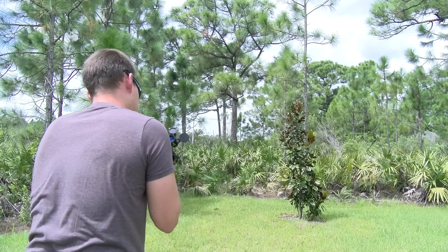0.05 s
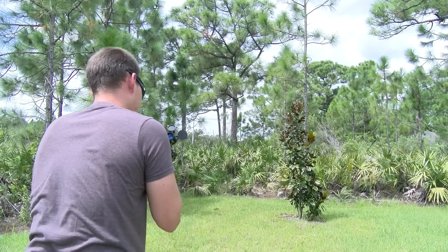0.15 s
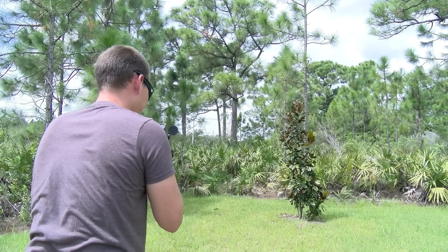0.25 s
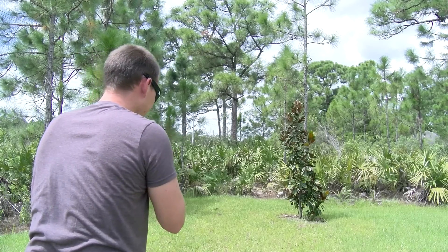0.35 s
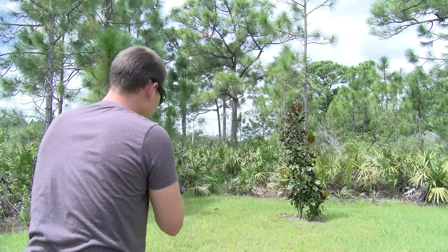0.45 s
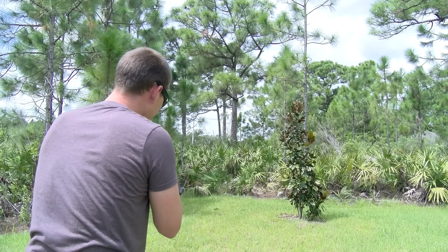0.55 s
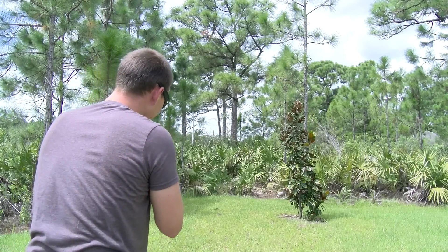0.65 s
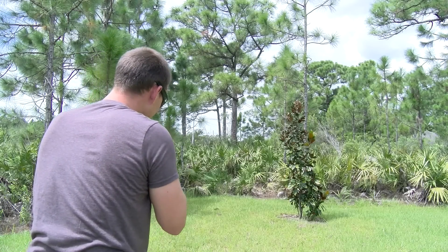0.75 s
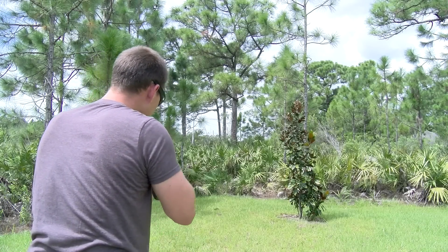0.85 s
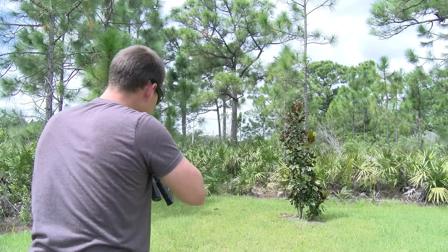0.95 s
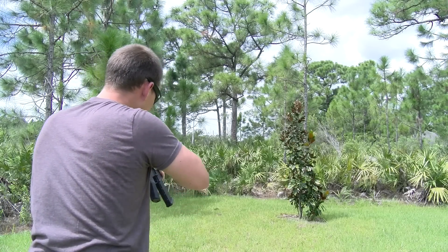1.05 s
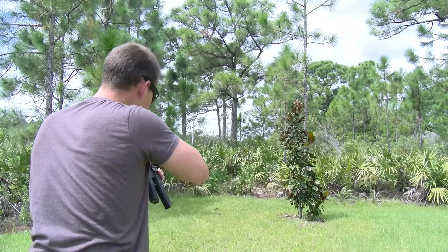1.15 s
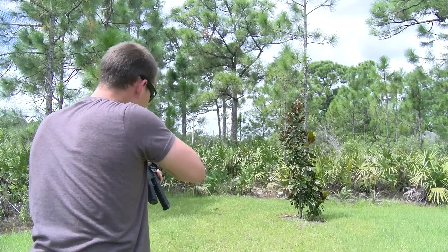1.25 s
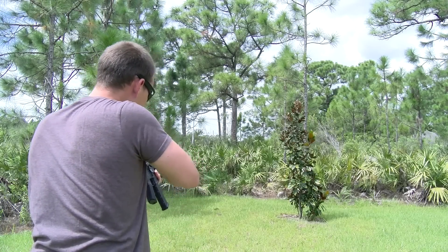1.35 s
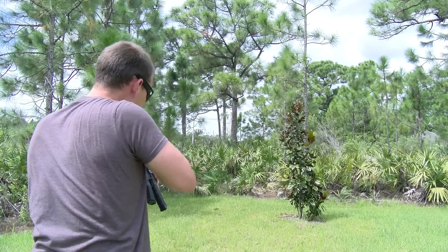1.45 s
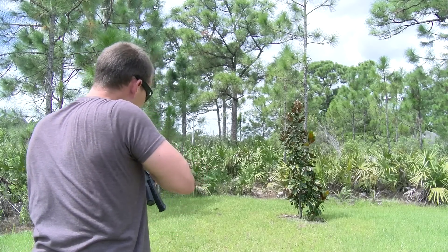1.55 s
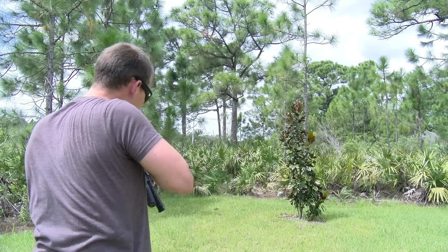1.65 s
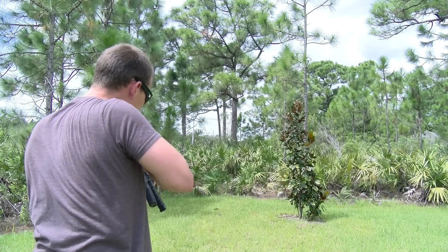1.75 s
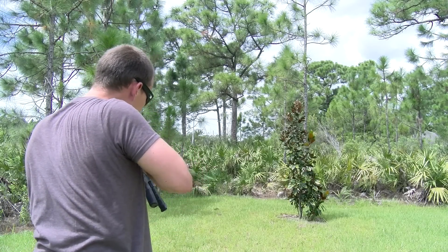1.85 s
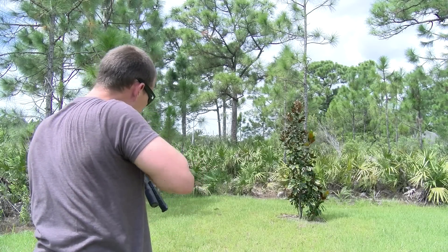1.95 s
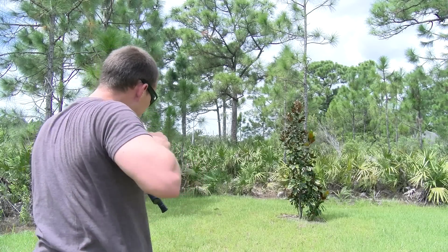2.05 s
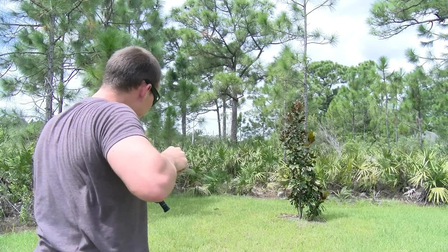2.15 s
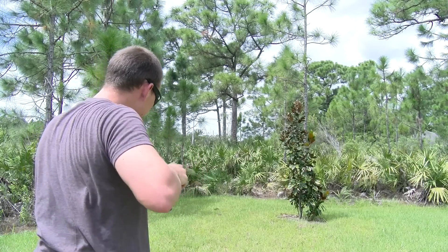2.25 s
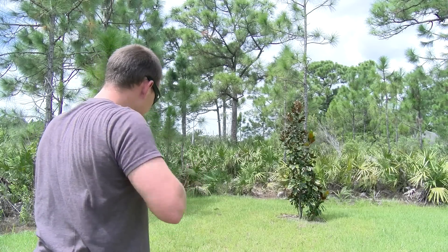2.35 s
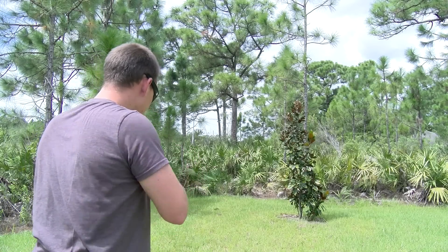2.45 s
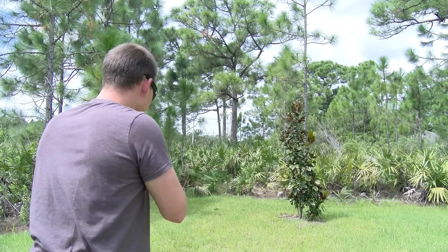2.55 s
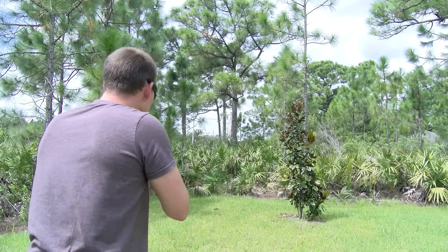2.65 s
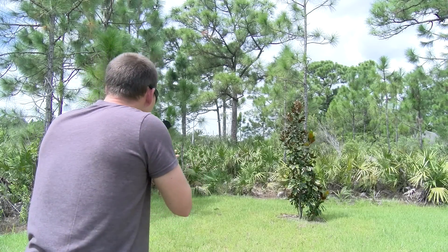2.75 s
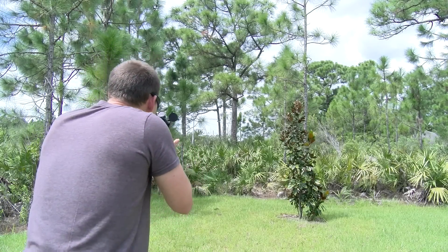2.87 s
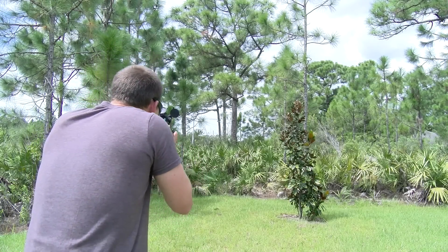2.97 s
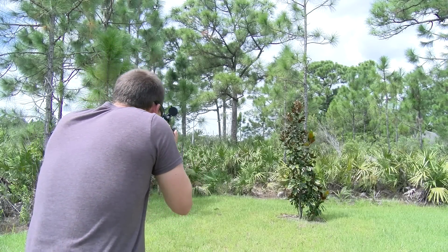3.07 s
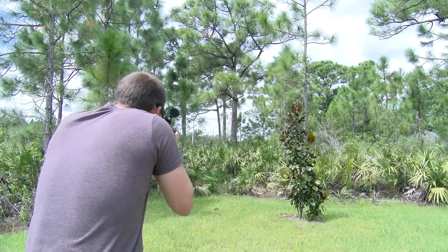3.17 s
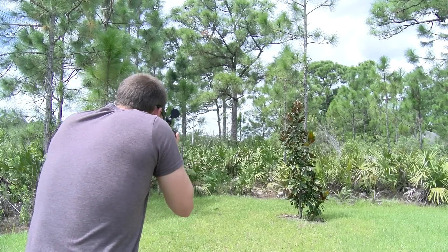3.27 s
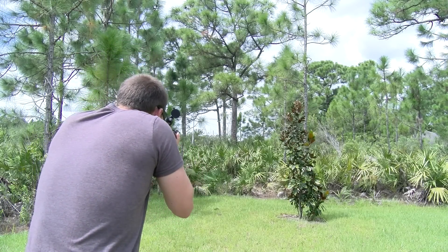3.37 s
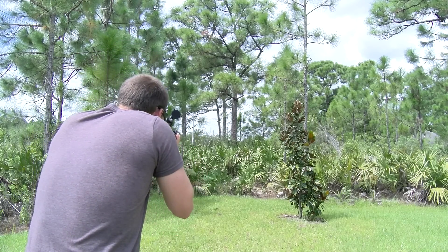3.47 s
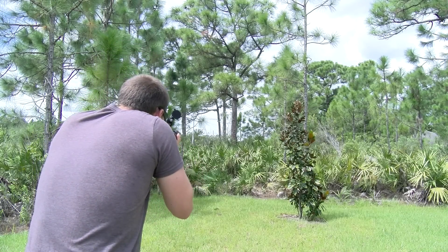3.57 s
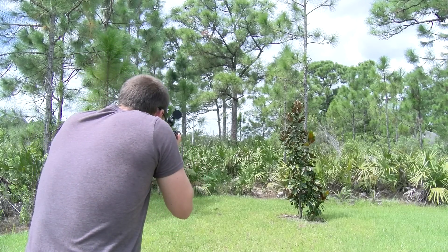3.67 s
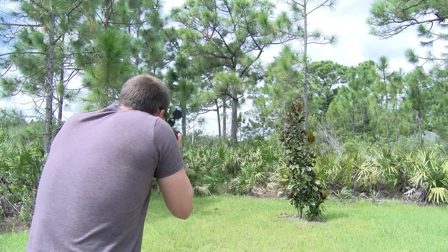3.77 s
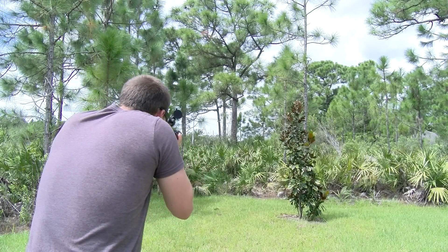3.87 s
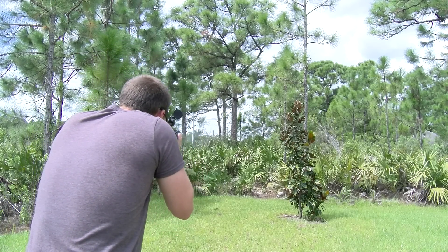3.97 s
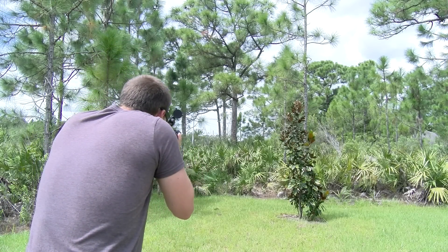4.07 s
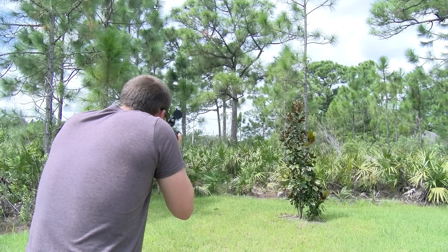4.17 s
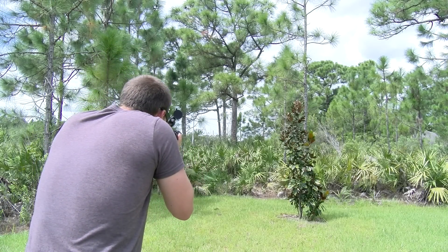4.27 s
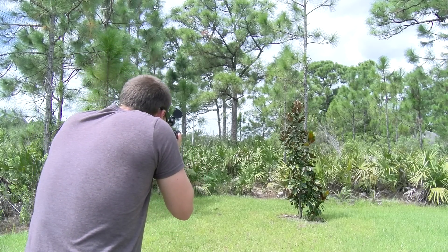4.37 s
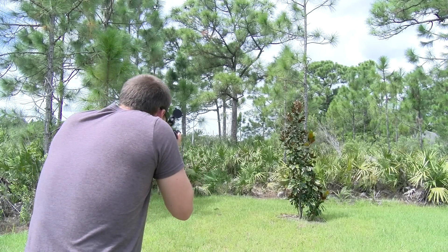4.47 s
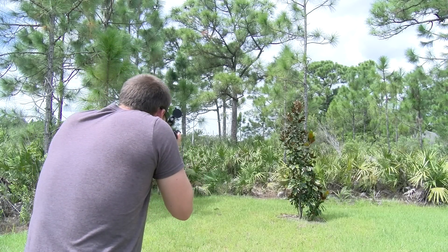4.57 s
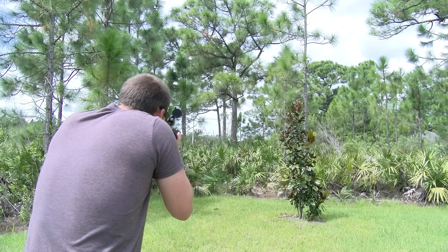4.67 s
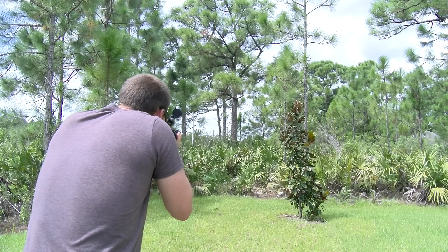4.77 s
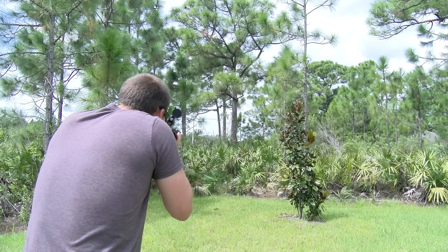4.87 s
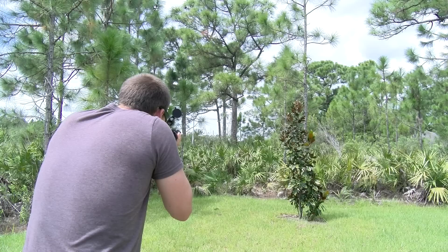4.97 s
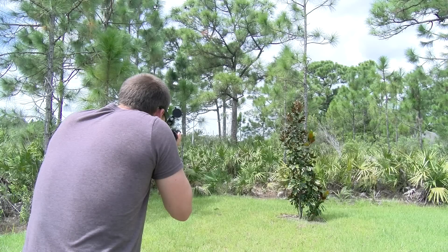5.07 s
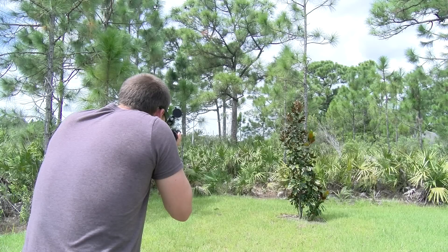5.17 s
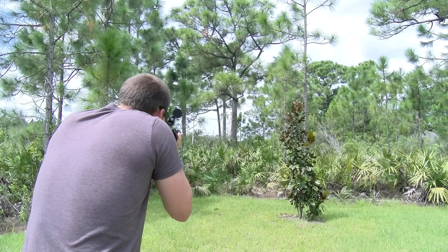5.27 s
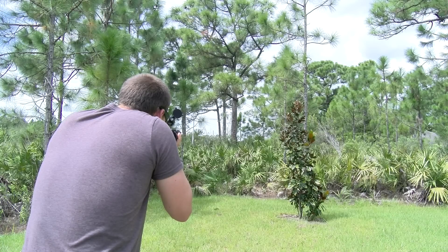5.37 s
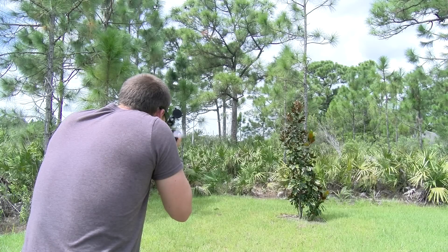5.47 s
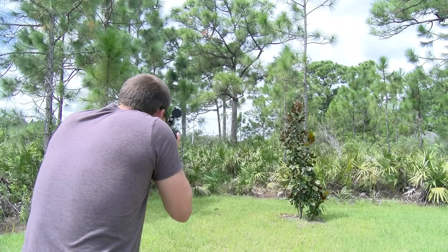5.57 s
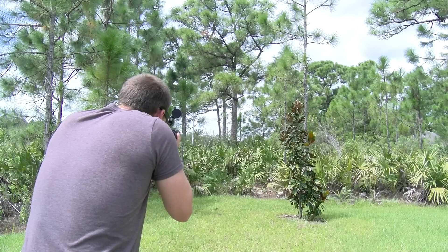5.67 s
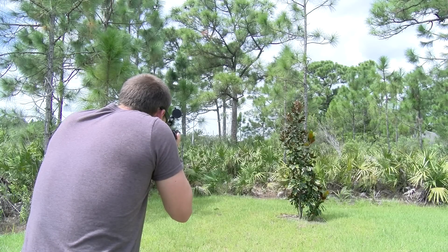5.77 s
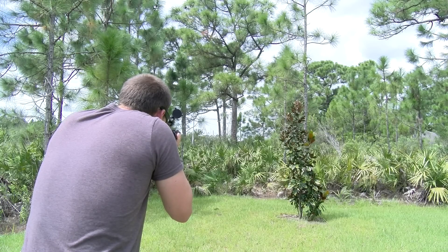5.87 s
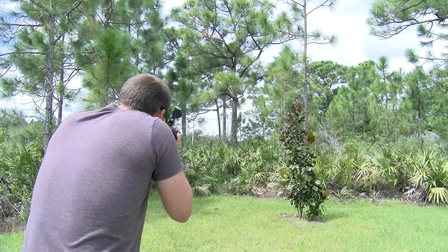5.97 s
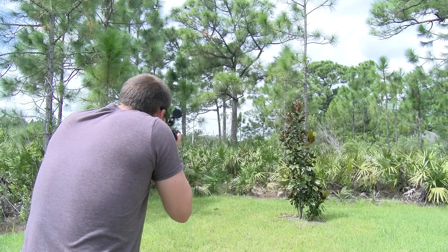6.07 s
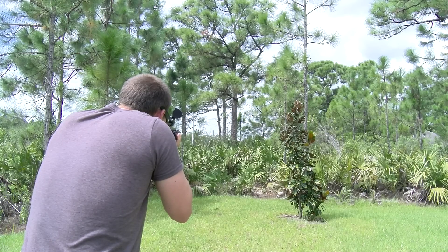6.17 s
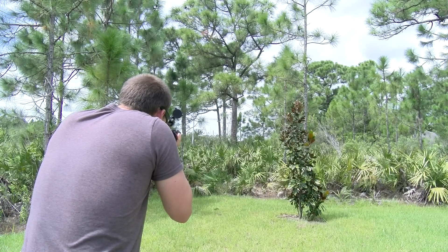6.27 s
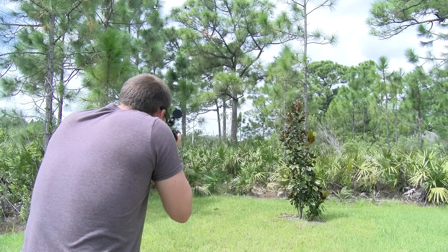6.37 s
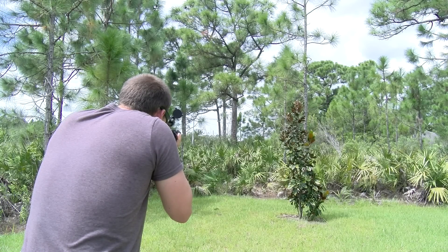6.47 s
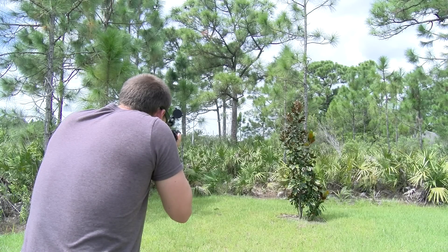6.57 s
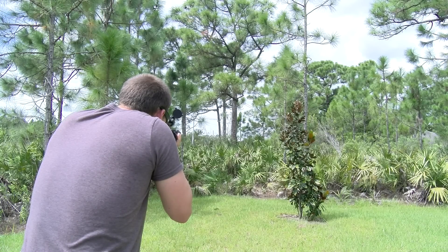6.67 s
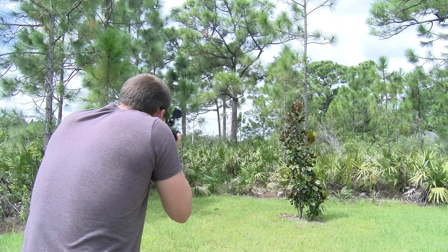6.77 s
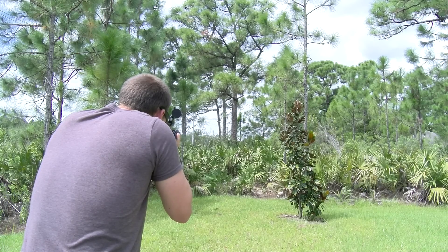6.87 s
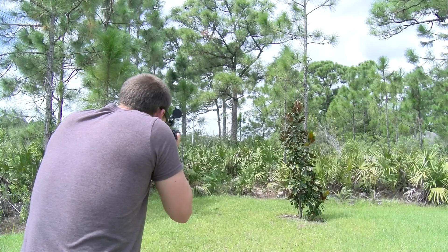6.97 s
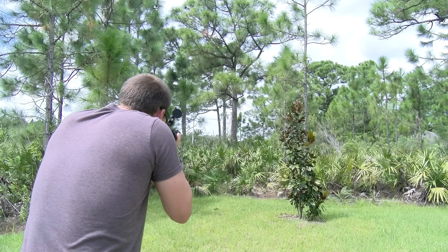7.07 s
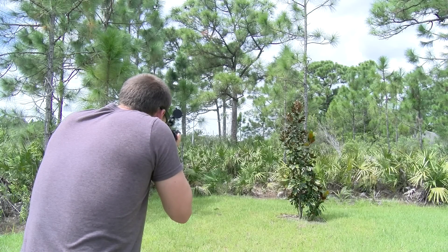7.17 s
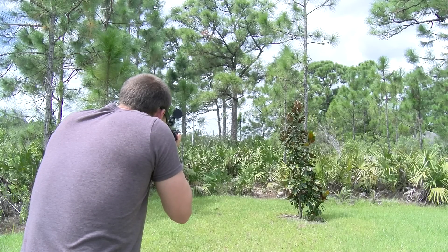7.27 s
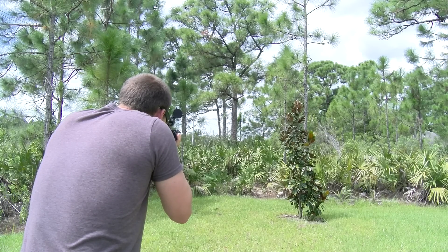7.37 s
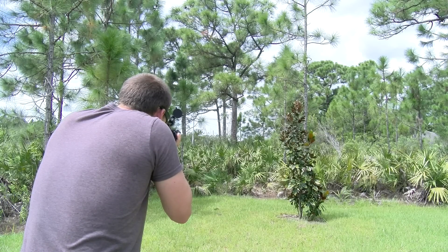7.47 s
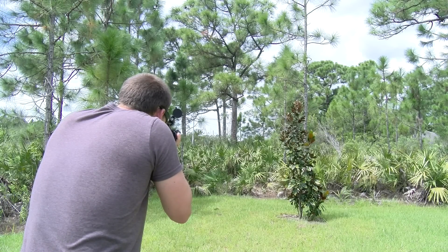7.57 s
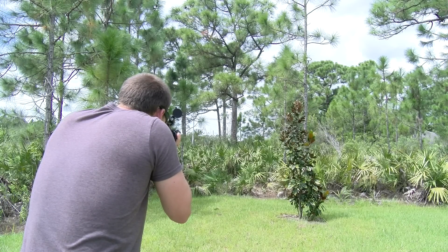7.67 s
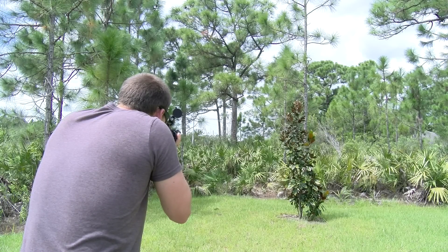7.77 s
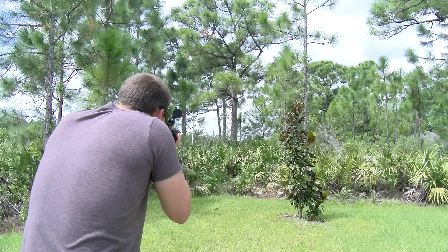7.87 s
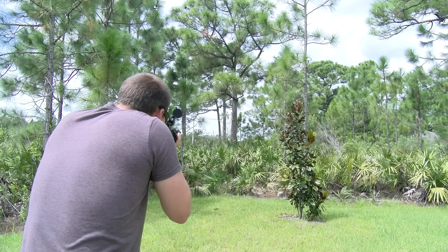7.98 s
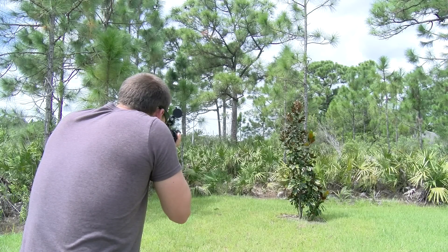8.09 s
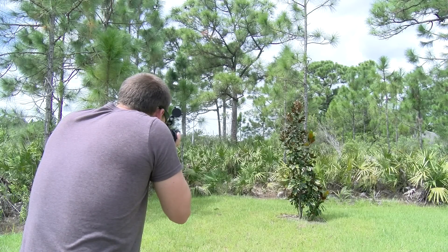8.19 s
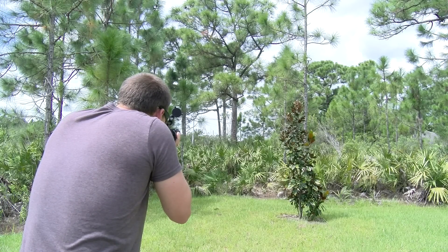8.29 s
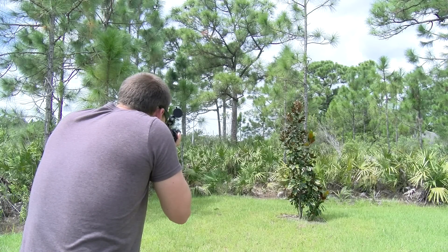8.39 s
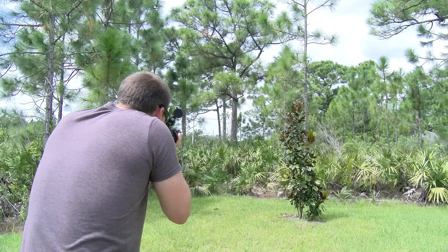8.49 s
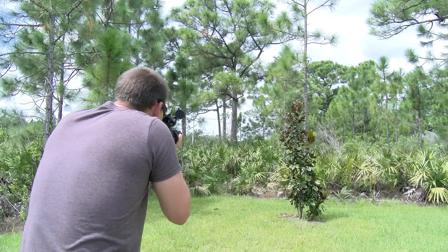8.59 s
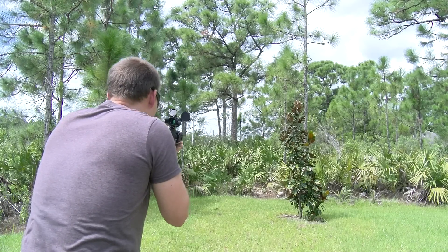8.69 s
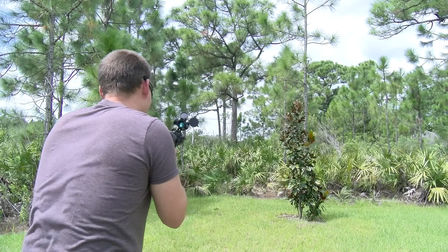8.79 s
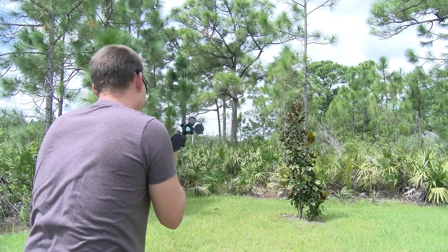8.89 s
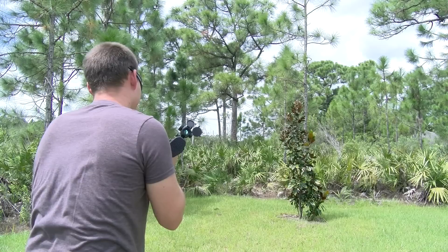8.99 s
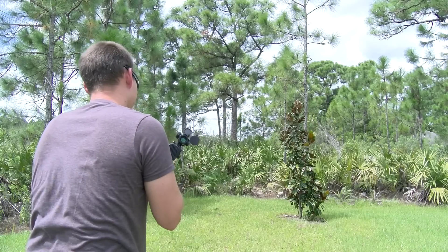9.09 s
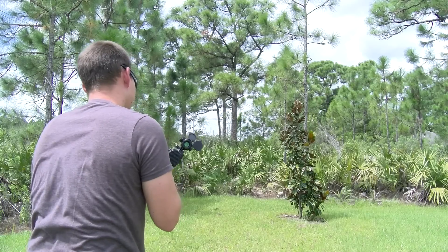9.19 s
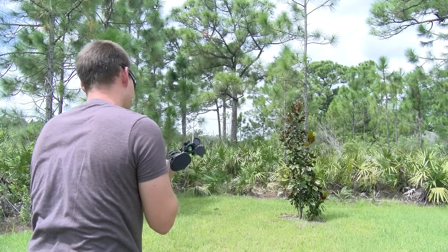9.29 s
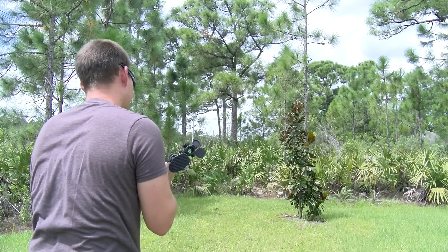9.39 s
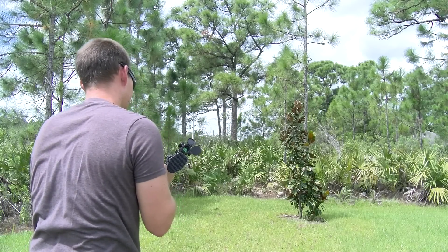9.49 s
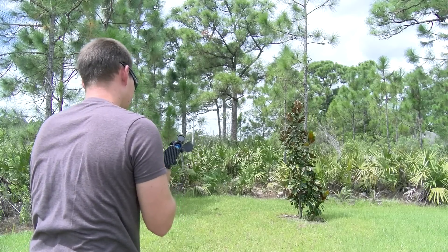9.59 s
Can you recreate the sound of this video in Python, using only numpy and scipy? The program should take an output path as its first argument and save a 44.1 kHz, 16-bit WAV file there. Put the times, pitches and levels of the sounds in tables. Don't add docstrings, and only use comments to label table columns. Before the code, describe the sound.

A stereo outdoor scene, microphones a few steps from a gas-powered pellet rifle. Underneath runs a quiet bed: far traffic rumble and tyre roar gently swelling, steady leaf rustle, a low wavering motor drone and faint high insect song, clearest in the first second and a half. A tiny handling click opens; around 1.4-1.6 s a cluster of metal clicks, then at 2.0 s a hard double clack as the bolt snaps forward. Quiet until four single shots at about 3.9, 5.5, 6.8 and 8.2 s. Each is a very quick click and pop, a dry punchy crack with a short gas hiss, then the bolt slamming metallically, the last slam strongest, with brief slaps off house walls and a short wash from trees. Light plastic ticks on leaves and dull bark taps follow at 4.2-4.6, 6.1-6.4 and 7.5 s. A soft metal click comes near 9.1 s, then only ambience.

```python
import sys
import numpy as np
from scipy import signal
from scipy.fft import rfft, irfft, next_fast_len
from scipy.io import wavfile
from scipy.ndimage import uniform_filter1d, map_coordinates

SR = 44100
rng = np.random.default_rng(int(sys.argv[2]) if len(sys.argv) > 2 else 0)


def convert_level_to_amplitude(level_db):
    exponent = np.asarray(level_db, float) / 20
    return 10 ** exponent


def to_wav(sig):
    pcm = np.clip(np.atleast_2d(sig), -1, 1) * 32767
    pcm = np.round(pcm).astype(np.int16)
    wavfile.write(sys.argv[1], SR, pcm.T)


N = 425124

# blast_s, valve_pop_lead_s, lawn_echo_delay_s
SHOTS = [
    (3.9503, .0108, .0052),
    (5.5180, .0136, .0057),
    (6.8253, .0137, .0057),
    (8.1734, .0136, .0047),
]
# freq_hz, level_db
CLACK = [(300, -22.5), (900, -6), (2000, -5.5), (3300, -4.5), (4300, -6), (6300, -5.5), (7800, -14),
         (10000, -37)]
# freq_hz, level_db
KNOCK = [(300, -27), (800, 0.5), (1800, -1), (3000, -30.5)]
SECOND_POP_S = .0055


def shots():
    # pitch_hz, share_of_peak, t60_s, phase (0 cosine, 1 sine)
    barrel = [(900, .45, .022, 0), (205, .3, .028, 1), (125, .14, .04, 1), (65, .07, .08, 1),
              (430, .17, .012, 0), (2900, .25, .008, 0)]
    # pitch_hz, share_of_peak, t60_s, phase (0 cosine, 1 sine)
    valve = [(450, .15, .025, 0), (230, .15, .035, 1), (2500, .9, .0025, 0)]
    # blast_db, hiss_db, hiss_before_blast_db, pop_db
    charge = [(-4.5, -19.5, -9, -21), (-2.5, -21, 1.5, -8.5), (-3, -18.5, -.5, -7.5),
              (-3.5, -19, -.5, -7.5)]
    # freq_hz, level_db (per Hz)
    gas_colour = [(180, -33.5), (300, -5.5), (1100, -5.5), (1360, -2.5), (1560, -11.5), (1810, -1),
                  (2100, -11), (2840, -4.5), (3890, -6.5), (6100, -8), (8640, -17.5), (13300, -24),
                  (16000, -37.5)]
    out = np.zeros((2, N))
    ms = np.arange(-SR // 50, SR // 15) * 1000 / SR
    blast, pop = pulse(barrel, rise_s=.00045), pulse(valve, rise_s=.00005)
    both = convert_level_to_amplitude([[.7], [-.7]])
    peak_s = .005
    for (s, lead_s, lawn_s), (blast_db, hiss_db, early_db, pop_db) in zip(SHOTS, charge):
        add(out, s - peak_s, convert_level_to_amplitude(blast_db) * blast * both)
        add(out, s + lawn_s - peak_s, convert_level_to_amplitude(blast_db - 7) * blast * both)
        add(out, s - lead_s - peak_s, convert_level_to_amplitude(pop_db) * pop * both)
        repeats = lead_s > .012
        add(out, s - lead_s + SECOND_POP_S - peak_s, convert_level_to_amplitude(pop_db - 2) * repeats * pop * both)
        snap = contact(.005, 5500, pan_db=4, alike=.75, rise_s=.00006)[2]
        add(out, s + .0007, convert_level_to_amplitude(-10.5) * snap)
        common, left, right = noise(gas_colour, size=(3, len(ms)))
        gas = (1.1 * common + .5 * np.array([left, right])) * convert_level_to_amplitude([[1.6], [-1.6]])
        turbulence = unit(uniform_filter1d(rng.standard_normal(len(ms)), size=30))
        gas = gas * convert_level_to_amplitude(1.6 * turbulence)
        add(out, s + ms[0] / 1000, gas * convert_level_to_amplitude(hiss_db) * hiss(ms, lead_s, lawn_s, early_db))
    return out


def pulse(columns, rise_s):
    t = np.arange(SR // 10) / SR - .005
    swing, start = 0, 0
    for hz, share, t60_s, sine in columns:
        phase = 2 * np.pi * hz * t
        swing = swing + share * convert_level_to_amplitude(-60 * t / t60_s) * (np.sin(phase) if sine else -np.cos(phase))
        start += 0 if sine else share
    return np.where(t < 0, -start * np.exp(np.minimum(t, 0) / rise_s), swing)


def hiss(ms, lead_s, lawn_s, early_db):
    pop_ms = ms + 1000 * lead_s
    early = puff(pop_ms, t60_ms=14) + puff(pop_ms - 1000 * SECOND_POP_S, t60_ms=14)
    early += convert_level_to_amplitude(-8) * puff(pop_ms, t60_ms=90)
    late = puff(ms, t60_ms=26) + puff(ms - 1000 * lawn_s, t60_ms=50)
    late += convert_level_to_amplitude(-9) * puff(ms, t60_ms=110)
    return convert_level_to_amplitude(early_db) * early + late


def puff(ms, t60_ms):
    after = np.maximum(ms, 0)
    rise_ms = .4
    return (1 - np.exp(-after / rise_ms)) * convert_level_to_amplitude(-60 * after / t60_ms)


def metal_parts():
    # pitch_hz, level_db, t60_s
    receiver = [(1865, 0, .035), (1960, -10, .02), (1700, -9, .025), (1250, -10, .02), (930, -13, .02),
                (450, -8, .03), (250, -13, .03), (3870, -11, .03)]
    out = np.zeros((2, N))
    for s, db, ring_db, clack_hz, t60_s, pan_db in action():
        t, shape, crack = contact(t60_s, clack_hz, pan_db, alike=.75, rise_s=t60_s / 80)
        crack = crack + convert_level_to_amplitude(-11.5) * shape * noise(KNOCK, size=len(t))
        ring = 0
        for hz, level_db, life_s in receiver:
            strength_db = level_db + rng.normal(0, 2)
            ring = ring + convert_level_to_amplitude(strength_db - 60 * t / life_s) * np.sin(2 * np.pi * hz * t)
        ring = ring * (1 - np.exp(-t / .0005))
        add(out, s, convert_level_to_amplitude(db - 3.5) * (crack + convert_level_to_amplitude(ring_db - 1.5) * ring))
    return out


def action():
    # start_s,
    # peak_db, receiver_ring_db, clack_hz, t60_s
    handling = [(.029, -54, -10.5, 2500, .025), (.0396, -35, -14, 2000, .025),
                (.7894, -57, -18, 4450, .025), (1.404, -38.5, -12, 2960, .025),
                (1.4079, -19, -12, 2600, .022), (1.4134, -30, -26, 3140, .025),
                (1.478, -29, -29, 3700, .025), (1.4825, -35, -18, 4000, .03),
                (1.5231, -44, -20, 3000, .025), (1.5405, -32.5, -14, 3220, .02),
                (1.5695, -36.5, -14, 1200, .055), (1.9652, -30, 10, 5000, .028),
                (1.9864, -50, 16, 2640, .025), (1.9985, -46, -6, 6300, .02), (2.005, -41, -29, 2500, .07),
                (2.020, -19.5, -6, 3500, .04), (2.0257, -12.5, -3, 3500, .03),
                (2.0365, -29, -4.5, 3850, .025), (3.937, -17, -20, 6000, .03),
                (9.0858, -47, -22, 4000, .03), (9.0891, -34, -10, 2700, .03)]
    # sear_before_pop_s, sear_db, hammer_snap_db
    trigger = [(.0065, -26, -3), (.0024, -27.5, -12), (.0037, -33.5, -12), (.0039, -32.5, -12)]
    # home_after_blast_s, home_db, magazine_brush_before_home_s, brush_db, rebound_after_home_s
    bolt = [(.0400, -13, .0071, -16, .0824), (.0364, -14.5, .0035, -16.5, .0766),
            (.0370, -12.5, .0069, -21.5, .0824), (.0324, -7.5, .0010, -25, .0793)]
    # receiver_ring_db, clack_hz, t60_s, left_right_db
    sear, hammer, magazine = (-24, 5000, .02, 1.5), (-30, 5500, .005, 4), (-12, 5300, .009, 0)
    slam, rebound = (-7, 3300, .027, 1), (-12, 3400, .025, 5)
    hands_pan_db, rebound_db = 1.5, -33
    rows = [(*row, hands_pan_db) for row in handling]
    for (s, lead_s, _), (sear_s, sear_db, snap_db), moves in zip(SHOTS, trigger, bolt):
        home_s, home_db, brush_s, brush_db, back_s = moves
        pop, home = s - lead_s, s + home_s
        rows += [(pop - sear_s, sear_db, *sear), (pop, snap_db, *hammer)]
        rows += [(home - brush_s, brush_db, *magazine), (home, home_db, *slam)]
        rows += [(home + back_s, rebound_db, *rebound)]
    return rows


def contact(t60_s, clack_hz, pan_db, alike, rise_s):
    # freq_hz, level_db
    sizzle = [(5000, -39), (7500, 1), (11000, 2), (15000, -6)]
    t = np.arange(SR // 16) / SR
    shape = convert_level_to_amplitude(-60 * t / np.clip(t60_s, .004, .07)) * (1 - np.exp(-t / rise_s))
    size = (3, len(t))
    layers = noise(CLACK, size) + convert_level_to_amplitude(-15.5) * noise(sizzle, size)
    layers += .9 * narrow(clack_hz, width_hz=600, size=size)
    pair = alike * layers[0] + np.sqrt(1 - alike ** 2) * layers[1:]
    return t, shape, shape * pair * convert_level_to_amplitude([[pan_db / 2], [-pan_db / 2]])


def pellets():
    # start_s, peak_db, knock_db, clack_hz
    strikes = [
        (4.2064, -47, -20, 7500),
        (4.2152, -28, -25, 5000),
        (4.3141, -50, -20, 4000),
        (4.336, -60, 7, 2000),
        (4.5416, -50.5, -17, 4160),
        (4.607, -38, -12, 2500),
        (6.1448, -38, -24, 4900),
        (6.3744, -59, 2, 2600),
        (7.4541, -44, -29, 5330),
    ]
    out = np.zeros((2, N))
    for s, db, knock_db, clack_hz in strikes:
        t, shape, crack = contact(.014, clack_hz, pan_db=1, alike=.55, rise_s=.00005)
        fade = np.cos(np.pi / 2 * t / t[-1])
        scatter = convert_level_to_amplitude(-18 - 60 * t / .14) * fade * noise(CLACK, size=(2, len(t)))
        knock = convert_level_to_amplitude(knock_db) * shape * noise(KNOCK, size=len(t))
        add(out, s, convert_level_to_amplitude(db - 1) * (crack + scatter + knock))
    return out


def sent_to_walls(gas, metal, hits):
    # freq_hz, level_db
    muzzle_away = [(200, -1), (2000, 0), (5000, -5), (16000, -5)]
    # freq_hz, level_db
    ring_away = [(1600, 0), (1865, -7), (2150, 0), (3000, 0), (3600, -3), (4400, 0)]
    blast = filtered(gas[0], lambda hz: convert_level_to_amplitude(along(muzzle_away, hz)))
    ring = filtered(metal[0], lambda hz: convert_level_to_amplitude(along(ring_away, hz)))
    return blast + ring + convert_level_to_amplitude(-14) * hits[0]


def yard_echo(sent):
    # freq_hz, t60_s
    yard_decay = [(60, 0.16), (300, .2), (1000, .3), (1700, 0.35), (4000, 0.29), (10000, 0.27),
                  (16000, .25)]
    # freq_hz, level_db
    wall_colour = [(60, -13.5), (250, -9.5), (700, -6.5), (1300, -2.5), (1650, 3), (2300, -3), (3400, -.5),
                   (4500, -1), (6400, 0.5), (8500, -1), (15000, 2)]
    echo_s = [.022, .0345, .0455, .0562, .083]
    echo_db = [-24, -14, -14, -13.5, -25]
    out = np.zeros((2, N + 2 * SR))
    hop, size = SR // 2, 2 * SR // 5
    slap = np.array([1, -.1, -.2, -.2])
    slap = slap / np.linalg.norm(slap)
    for at in range(0, N, hop):
        if np.abs(sent[at:at + hop]).max() < 1e-4:
            continue
        hz, t, z = signal.stft(rng.standard_normal((3, size)), SR, nperseg=128)
        rise = np.clip((t - .012) / .055, 0, 1)
        fall_db = along(wall_colour, hz)[:, None] - 60 * t / along(yard_decay, hz)[:, None]
        tail = signal.istft(z * rise * convert_level_to_amplitude(fall_db), SR, nperseg=128)[1]
        tail *= convert_level_to_amplitude(-16.5) / np.linalg.norm(tail[0])
        for s, db in zip(echo_s, echo_db):
            add(tail[0], s, convert_level_to_amplitude(db) * slap)
        wall = np.array([np.roll(tail[0], 5), tail[0]])
        pair = (wall + .97 * tail[1:]) * convert_level_to_amplitude([[-.8], [.8]])
        add(out, at / SR, signal.fftconvolve(sent[None, at:at + hop], pair, axes=1))
    return out[:, :N]


def traffic():
    # closest_s, half_width_s, rumble_db
    trucks = [(0, .2, -51), (.75, .25, -50), (2.05, .45, -49), (3.75, .35, -48.5), (5.15, .25, -49),
              (6.7, .45, -49), (7.5, .3, -51), (9.1, .3, -49)]
    # closest_s, half_width_s, tyre_roar_db
    cars = [(.52, .25, -55), (1.4, .3, -62), (2.2, .25, -57), (3.35, .25, -59), (4.8, .15, -63),
            (5.95, .3, -54.5), (7.05, .3, -58), (8.1, .3, -55), (9.1, .25, -57)]
    # freq_hz, level_db (per Hz)
    rumble = [(8.8, -32), (15, -2), (76, -2), (97, -2), (156, -10.5), (190, -9.5), (215, -17), (237, -16),
              (313, -24.5), (420, -25), (550, -47), (920, -120)]
    # freq_hz, level_db (per Hz)
    roar = [(180, -36), (300, -4), (313, -9.5), (667, 0.5), (793, -5.5), (924, -4), (1080, -8), (1230, -18),
            (1700, -25), (2210, -57), (3740, -120)]
    engines = np.hypot(convert_level_to_amplitude(-53), convert_level_to_amplitude(-2.5) * swells(trucks)) * rush(rumble, patchy_db=.93)
    tyres = np.hypot(convert_level_to_amplitude(-62.5), swells(cars)) * convert_level_to_amplitude(.53 * wobble(4.4)) * rush(roar, patchy_db=.8)
    return engines + tyres


def leaves():
    # freq_hz, level_db (per Hz)
    rustle = [(760, -29), (1300, -2.5), (1660, -7.5), (1820, -4), (2230, -6), (3510, -5), (5940, -3),
              (6890, -5), (8160, -6), (10400, -14.5), (14000, -21), (15200, -19), (16200, -30.5)]
    return convert_level_to_amplitude(-64.5 + .4 * wobble(.7)) * rush(rustle, patchy_db=.2)


def machine():
    # middle_s, half_width_s, level_db
    low_hum = [(0, .15, -49), (.7, .2, -56), (1.9, .2, -58), (2.6, .1, -54), (2.95, .1, -55),
               (3.95, .3, -49), (4.55, .2, -54), (5.4, .2, -49), (6.3, .5, -50), (7.6, .6, -50),
               (8.4, .2, -50), (9.2, .3, -54)]
    # middle_s, half_width_s, level_db
    high_hum = [(0, .2, -60), (3, .3, -64), (4.05, .08, -55), (4.9, .1, -58), (5.75, .25, -58),
                (6.6, .2, -53), (7.45, .25, -58), (8.15, .15, -52), (8.85, .1, -61)]
    # pitch_hz, level_db (rms)
    tones = [
        (188.4, -65.5),
        (14777, -92),
    ]
    hum = swells(low_hum) * convert_level_to_amplitude(2.2 * wobble(4.2) - 3.5) * drone(72, drift_hz=2.8)
    hum += swells(high_hum) * convert_level_to_amplitude(1.5 * wobble(4.2) - 2.5) * drone(123, drift_hz=2.5)
    t = np.arange(N) / SR
    for hz, db in tones:
        hum += convert_level_to_amplitude(db + 1.2 * wobble(3.6)) * np.sqrt(2) * np.sin(2 * np.pi * hz * t)
    return hum


def drone(hz, drift_hz):
    return np.sqrt(2) * np.sin(2 * np.pi * np.cumsum(hz + drift_hz * wobble(4.6)) / SR)


def insects():
    # start_s, end_s, pitch_hz, level_db
    singers = [(-.7, .35, 4043, -72.5), (.1, .9, 4447, -77.5), (.6, 1.45, 4447, -75), (.7, 1.45, 4170, -77),
               (.75, 1.4, 6393, -77), (.4, .75, 8615, -79), (.7, 1.45, 8062, -81), (.9, 1.3, 6060, -82)]
    # start_s, end_s, pitch_hz, width_hz, level_db
    chorus = [(-.8, 1.45, 4800, 1200, -69.5), (1.0, 3.5, 8300, 200, -76.5), (1.0, 3.5, 9100, 400, -75.5),
              (4.25, 5.45, 4200, 80, -81), (4.25, 5.1, 5000, 80, -82), (6.1, 6.9, 7950, 70, -76.5),
              (7.4, 8.7, 7900, 70, -76.5), (9.1, 9.9, 5800, 70, -80)]
    wing_hz, wing_db = 101, -2.5
    out = np.zeros((2, N + 2 * SR))

    def swell(start, end):
        return signal.windows.tukey(round((end - start) * SR), .7)

    def line(hz, size):
        pure = np.sin(2 * np.pi * hz * np.arange(size) / SR)
        return 1.2 * pure + .6 * narrow(hz, 25, size)

    for start, end, hz, db in singers:
        shape = swell(start, end)
        song = line(hz, len(shape)) + convert_level_to_amplitude(wing_db) * line(hz + wing_hz, len(shape))
        add(out, 1 + start, convert_level_to_amplitude(db) * shape * song * convert_level_to_amplitude([[1.5], [-1.5]]))
    for start, end, hz, width_hz, db in chorus:
        shape = swell(start, end)
        here, apart = narrow(hz, width_hz, size=(2, len(shape)))
        add(out, 1 + start, convert_level_to_amplitude(db) * shape * np.array([.8 * here, .8 * apart - .25 * here]))
    return out[:, SR:SR + N]


def swells(rows):
    t = np.arange(N) / SR
    return np.sqrt(sum(convert_level_to_amplitude(db) ** 2 / (1 + ((t - s) / half_s) ** 2) for s, half_s, db in rows))


def rush(spectrum, patchy_db):
    # freq_hz, likeness (-1 to 1)
    likeness = [(25, 0.6), (60, 0.7), (110, 1.0), (200, 0.66), (380, 0.6), (700, 0.56), (1290, 0.17),
                (2380, 0.12), (4400, -0.056), (8120, -0.08), (15000, 0.45)]
    z = signal.stft(rng.standard_normal((2, N)), nperseg=512)[2]
    field = uniform_filter1d(rng.standard_normal(z.shape[1:]), size=6, axis=0)
    field = uniform_filter1d(field, size=14, axis=1)
    pair = signal.istft(z * convert_level_to_amplitude(patchy_db * unit(field)), nperseg=512)[1][:, :N]

    def mid_side(hz):
        angle = np.arccos(np.clip(along(likeness, hz), -1, 1)) / 2
        return convert_level_to_amplitude(along(spectrum, hz)) * np.array([np.cos(angle), np.sin(angle)])

    mid, side = filtered(pair, mid_side)
    return unit(np.array([mid + side, mid - side]))


def noise(spectrum, size):
    return unit(filtered(rng.standard_normal(size), lambda hz: convert_level_to_amplitude(along(spectrum, hz))))


def narrow(hz, width_hz, size):
    return unit(filtered(rng.standard_normal(size), lambda f: 1 / (1 + ((f - hz) / width_hz) ** 2)))


def wobble(rate):
    knots = rng.standard_normal(int(N * rate / SR) + 4)
    return map_coordinates(knots, [np.arange(N) * rate / SR])


def filtered(x, response):
    n = x.shape[-1]
    m = next_fast_len(n + 2048)
    return irfft(rfft(x, m) * response(np.fft.rfftfreq(m, 1 / SR)), m)[..., :n]


def along(points, hz):
    f, v = np.transpose(points)
    return np.interp(np.log(hz + 1), np.log(f + 1), v)


def unit(x):
    return x / np.sqrt(np.mean(x ** 2) + 1e-20)


def add(track, s, sound):
    at = round(s * SR)
    track[..., at:at + sound.shape[-1]] += sound


def scene():
    # freq_hz, left_lead_rad
    ports = [(0, 0), (2000, .3), (6000, .7), (8500, 2), (11000, 2), (16000, 1)]
    gas, metal, hits = shots(), metal_parts(), pellets()
    lead = lambda hz: np.exp(.5j * along(ports, hz) * np.array([[1], [-1]]))
    near = filtered(gas + metal + hits, lead)
    echoes = yard_echo(sent_to_walls(gas, metal, hits))
    return near + echoes + traffic() + leaves() + machine() + insects()


def top_cut(x):
    return signal.sosfilt(signal.butter(12, 16650, fs=SR, output="sos"), x)


def record(dry):
    soft = dry / (1 + np.abs(dry / .95) ** 8) ** (1 / 8)
    mix = filtered(soft, lambda hz: hz < 16100)
    return top_cut(mix)


dry = scene()
out = record(dry)
to_wav(out)
```